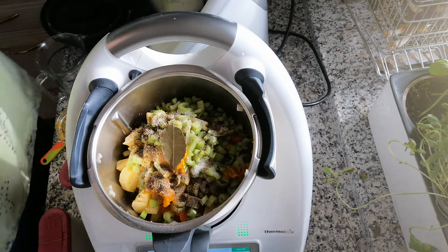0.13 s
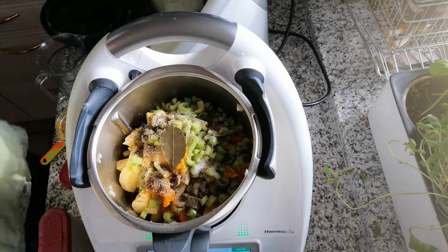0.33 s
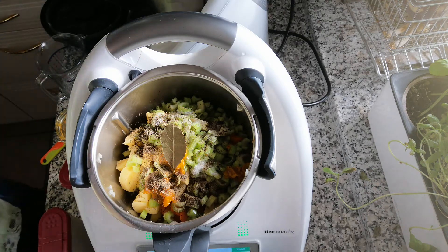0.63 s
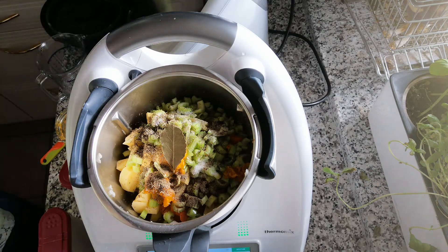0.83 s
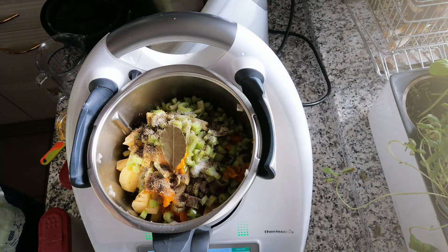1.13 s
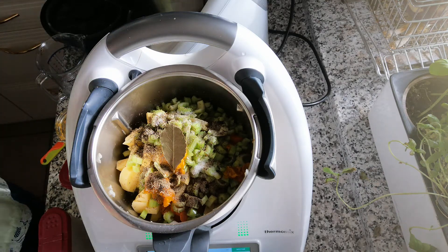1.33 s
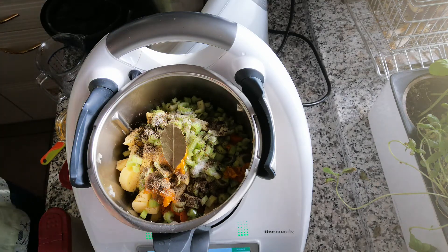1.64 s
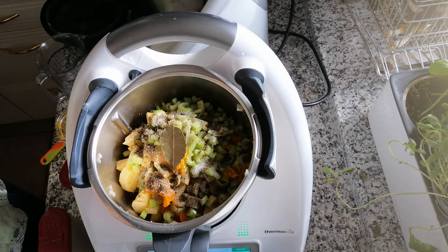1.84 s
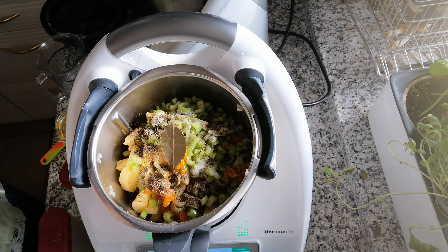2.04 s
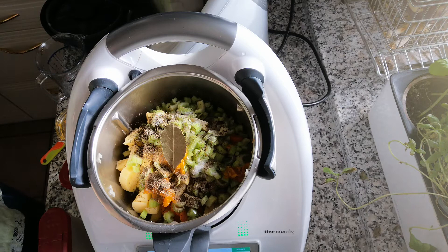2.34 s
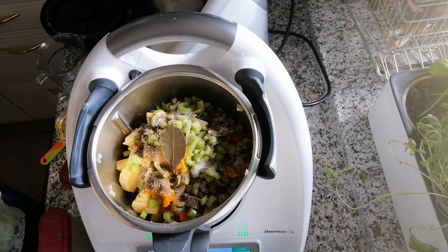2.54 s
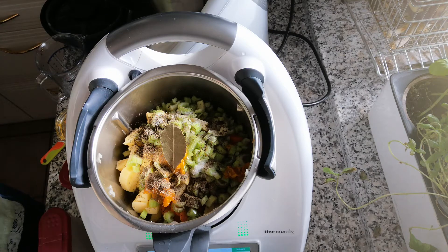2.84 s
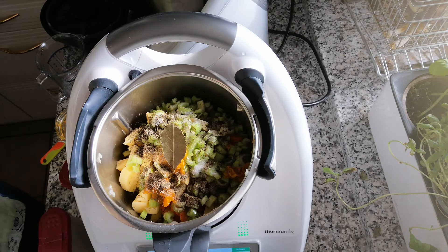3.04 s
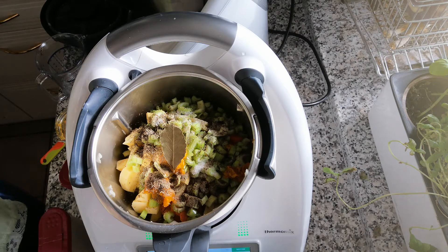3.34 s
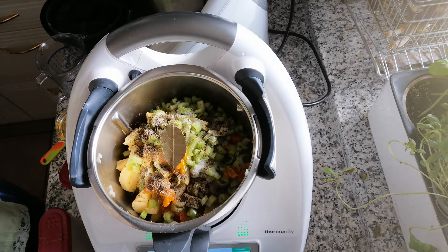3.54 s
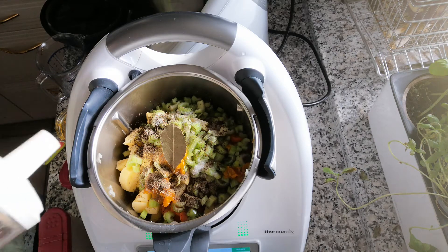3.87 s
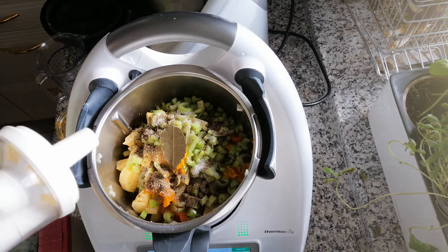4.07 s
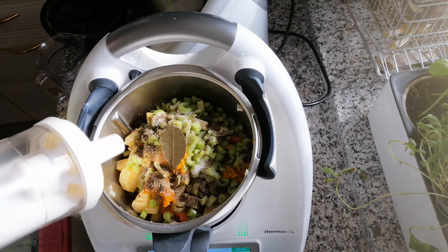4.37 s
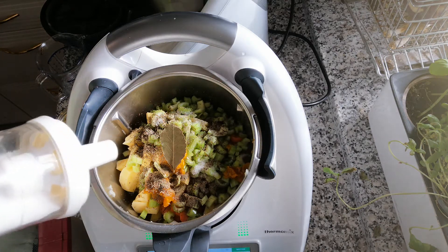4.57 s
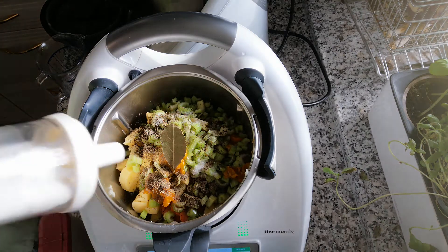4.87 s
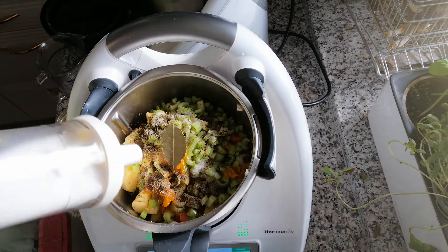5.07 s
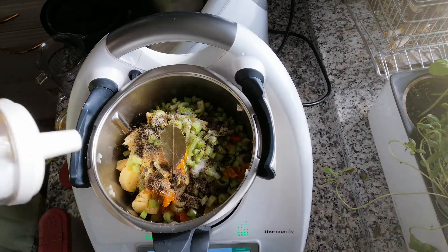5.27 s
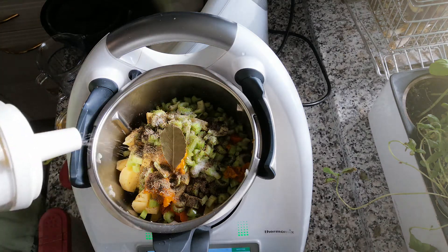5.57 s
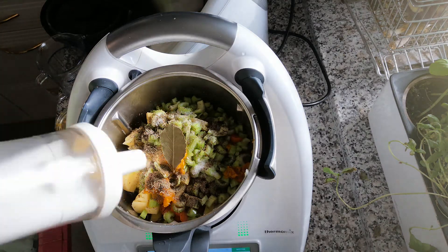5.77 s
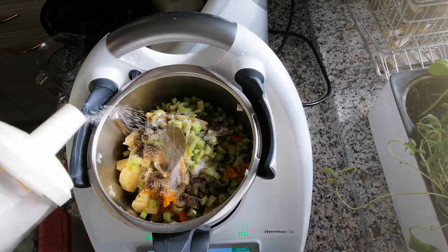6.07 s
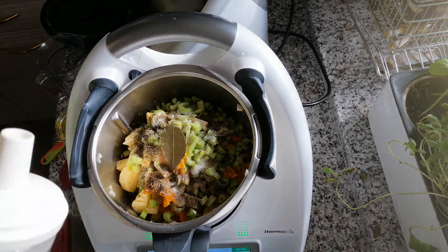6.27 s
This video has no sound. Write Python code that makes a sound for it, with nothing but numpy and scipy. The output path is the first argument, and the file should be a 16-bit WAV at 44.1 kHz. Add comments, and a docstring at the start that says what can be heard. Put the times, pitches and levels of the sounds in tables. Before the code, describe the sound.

Plastic and glass containers knock in a small kitchen, one ringing brightly, a cap pops, then sugar hisses in bursts from a shaker.

```python
"""Containers are handled in a small hard-walled kitchen: a plastic tub, a glass jar, a sugar shaker and a shelf
sound as damped modes with a contact click, except the shaker, which has modes alone; a popped cap adds neck air.
Sugar slides in the shaker and is shaken out over the food as dense random impacts, coloured by where they land.
Small ticks and an early scuff join in; echoes and a decaying noise tail make the room.
Behind it all a refrigerator hums as narrow noise bands in broad room air."""
import sys
import numpy as np
from scipy import signal
from scipy.fft import rfft, irfft, next_fast_len
from scipy.io import wavfile

SR = 44100
rng = np.random.default_rng(int(sys.argv[2]) if len(sys.argv) > 2 else 0)


def digitize_waveform(pressure):
    """Quantize a signal to 16-bit integers and store it at the path in sys.argv[1].

    Rows of a 2-D input are taken as channels; values are limited to [-1, 1].
    """
    field = np.atleast_2d(pressure).T
    bounded = np.clip(field, -1, 1)
    quanta = np.round(bounded * 32767).astype(np.int16)
    wavfile.write(sys.argv[1], SR, quanta)


N = 282548
TIME = np.arange(N) / SR
SIDES = np.array([[.5], [-.5]])   # times a left-minus-right difference: the share of each channel

# Blow on the jar: start_s, strength_db, left_minus_right_db, left_lag_ms
JAR_BLOWS = [(0.8803, -18.5, -2.5, -0.029)]


def tub():
    """Modal impact: a knocked plastic tub has few, heavily damped modes under a contact click."""
    # Knocks: start_s, strength_db, left_minus_right_db, left_lag_ms
    tub_blows = [(.5797, -18.5, -4, -.02)]
    # Modes of the tub: pitch_hz, level_db, t60_s
    tub_modes = [(289, -34.5, 0.1), (605, -30, 0.026), (2360, -26, 0.011)]
    # Spectrum of the contact click: frequency_hz, relative_db (per Hz)
    tub_click = [(120, -41.5), (200, -35.5), (310, -12), (520, -27.5), (750, -5), (1020, -5.5), (1360, -12),
                 (1900, -9.5), (2420, 2), (3010, -14.5), (4500, -23), (6200, -34), (8000, -52),
                 (10600, -41), (15000, -68)]
    knock = ringing(tub_modes, contact_s=0.00034)
    knock += crack(tub_click, db=5.0, rattle_db=-19.0, t60=0.033)
    return no_bass(place(tub_blows, knock), hz=224.4)


def jar():
    """Modal impact: the glass body rings briefly after a very short, bright contact."""
    # Modes of the jar body: pitch_hz, level_db, t60_s
    body_modes = [(286, -28, 0.091), (408, -25, 0.052), (2760, -32, 0.021), (3940, -12, 0.028)]
    # Spectrum of the contact click: frequency_hz, relative_db (per Hz)
    jar_click = [(120, -30), (200, -33), (600, -13), (1100, -4.5), (2000, -3), (2750, 0.5), (3700, -3),
                 (5100, -11.5), (7500, -9.5), (9000, -12), (13000, -17), (15500, -71)]
    knock = ringing(body_modes, contact_s=0.000076)
    knock += crack(jar_click, db=3.5, rattle_db=-17.0, t60=0.065)
    return no_bass(place(JAR_BLOWS, knock), hz=224.4)


def glass_ring():
    """Energy storage: the thin jar wall sings on; the room stores each tone, so it holds and then falls."""
    # Wall modes: pitch_hz, level_db, t60_s, left_minus_right_db,
    # lobe_sign (1 or -1: same or opposite lobe faces each side)
    wall_modes = [(3461, -40.5, .4, -2, -1), (4226, -50, .3, -3, 1), (5454, -28.5, .33, -6, 1),
                  (6342, -48, .3, -1, -1), (8005, -42, .25, -4, -1), (9900, -54, .18, 3, 1),
                  (10350, -53, .19, 0, -1), (11410, -60, .14, 0, 1), (12760, -52, .09, 0, 1)]
    start_s, _, _, lag_ms = JAR_BLOWS[0]
    t = np.maximum(TIME - start_s - SIDES * lag_ms / 1000, 0)
    stored = (1 + 25 * t) * (1 - np.exp(-t / .003))
    rings = 0
    for hz, db, t60, pan_db, lobe in wall_modes:
        gain = from_db(db + pan_db * SIDES - 60 * t / t60)
        rings = rings + gain * [[1], [lobe]] * np.sin(2 * np.pi * hz * t)
    return stored * rings


def cap_pop():
    """Cavity resonance: the cap springs free with its own modes while the air in the neck swells and dies."""
    # Pops: start_s, strength_db, left_minus_right_db, left_lag_ms
    pops = [(2.8503, -8.5, -5.5, 0.13)]
    # Modes of the cap: pitch_hz, level_db, t60_s
    cap_modes = [(283.8, -27.5, .06), (374, -31.5, 0.14), (540.6, -18.5, 0.052), (876, -6.5, .13),
                 (1037, -19, 0.07), (1065, -16.5, .13), (1350, -34.5, .03)]
    # Spectrum of the release click: frequency_hz, relative_db (per Hz)
    cap_click = [(880, -33.5), (1500, -1.5), (2000, -6.5), (2400, 0.5), (2800, -12.5), (3300, -1.5),
                 (3800, 4), (4500, -14.5), (5200, -13), (6000, -27.5), (12000, -46.5), (16000, -71.5)]
    neck_hz, neck_width_hz = 946, 320
    pop = ringing(cap_modes, contact_s=0.001521) + swell(neck_hz, neck_width_hz, order=3)
    pop += crack(cap_click, db=-20.5, rattle_db=-10, t60=.2)
    return no_bass(place(pops, pop), hz=224.4)


def shaker():
    """Modal impact: a longer contact leaves only the modes of the bumped shaker, without a click."""
    # Bumps: start_s, strength_db, left_minus_right_db, left_lag_ms
    shaker_blows = [(2.071, -21, 6, 0.12), (2.076, -21.5, -12, .2), (2.1245, -26.5, -13.5, .2),
                    (2.168, -38, -13, .2)]
    # Modes of the shaker: pitch_hz, level_db, t60_s
    shaker_modes = [(522, -10, 0.033), (755.3, -8, 0.081), (881, -1.5, 0.052), (923, -16, 0.086),
                    (1020, -31, 0.067), (1060, -23, 0.21)]
    return no_bass(place(shaker_blows, ringing(shaker_modes, contact_s=0.00097)), hz=224.4)


def shelf():
    """Modal impact: a large body has low modes, so bumps on the shelf thud and rattle."""
    # Bumps: start_s, strength_db, left_minus_right_db, left_lag_ms
    shelf_bumps = [(.72, -50, -3.5, .1), (2.0492, -16.5, -8.5, 0.25)]
    # Modes of the shelf: pitch_hz, level_db, t60_s
    shelf_modes = [(118, -0.5, 0.12), (145, -8.5, 0.24), (214, -3, 0.019), (431.4, -7, 0.044),
                   (570, -24.5, 0.13)]
    # Spectrum of the contact click: frequency_hz, relative_db (per Hz)
    shelf_click = [(100, -19.5), (300, -5), (700, 0.5), (1100, -9), (1500, -15.5), (2700, -11.5),
                   (4000, -27.5), (8000, -51)]
    thud = ringing(shelf_modes, contact_s=0.0012)
    thud += crack(shelf_click, db=-16, rattle_db=-15, t60=0.43)
    return -no_bass(place(shelf_bumps, thud), hz=45.2)


def sugar():
    """Granular flow: crystals ring the shaker inside, click brightly in the open and tap the walls lower."""
    # Slides and tosses: full_strength_s, level_db, rise_s and fall_s (over 20 dB), hold_s,
    # wall_taps_relative_db, left_minus_right_db, share_outside (0-1)
    slides = [(1.313, -69, .07, 0.14, .003, -0.5, -4.5, .15),
              (1.49, -63, 0.063, 0.14, 0.064, -10.5, -2.7, .02),
              (1.752, -75.5, .01, 0.28, .003, -3, 0.5, 0.45),
              (2.009, -60, 0.0072, 0.062, .003, -6, 1.5, 0.37),
              (2.059, -50.5, 0.018, .12, 0.0099, 0.5, -1, 0.35),
              (2.24, -69.5, 0.21, 0.26, 0.019, -13, -2, .4), (3.2, -71, .2, 0.28, 0.02, -27.5, -5, 0.023),
              (3.66, -69, 0.2, 0.087, 0.014, -9, -2, 0.35), (4.0, -60, 0.24, .18, 0.17, -15.5, -3, 0.25),
              (4.64, -71, 0.53, 0.15, .02, -21, -3, .4),
              (4.885, -54.5, 0.069, 0.14, 0.05, -12.5, -3.5, .15),
              (5.18, -55.5, 0.078, 0.085, 0.019, -9.5, -5, .2),
              (5.24, -58.5, .01, .05, 0.002, -19.5, -1, 0.77),
              (5.28, -48, 0.034, 0.045, .003, -16, -1.5, 0.66),
              (5.33, -60, .05, 0.071, .003, -18, -1, 0.67), (5.78, -61.5, 0.044, 0.069, .02, -15, -7, 0.32),
              (5.84, -58, 0.046, .1, .003, -8.5, -4.5, 0.11), (5.944, -57, .004, 0.02, .003, -25, -1, .7),
              (6.07, -44, 0.1, 0.089, 0.054, -15, -1, 0.77), (6.39, -49, 0.17, .1, .03, -14.5, -3.5, 0.34)]
    # Spectra of grains inside, in the open and on the walls: frequency_hz, relative_db (per Hz)
    inside_colour = [(2350, -35), (4000, -13.5), (4330, -15), (5430, -6), (6370, -5), (7250, 2.5),
                     (8120, -7.5), (9570, -1.5), (14300, -20.5), (15200, -21.5), (15500, -31)]
    outside_colour = [(2350, -30.5), (4000, -5), (4560, -14), (5370, -2), (7210, -4), (8260, -7.5),
                      (11100, -1), (14600, -12), (15500, -18)]
    wall_colour = [(470, -48), (800, -15.5), (1230, -10.5), (1630, -21), (1920, -3.5), (3080, -2.5),
                   (5000, -10.5), (6500, -29.5), (11000, -120)]
    near = .25   # power share that both sides hear alike
    right_lag = 2   # samples by which the right side hears the shared grains later
    wall_flank = 1.16   # wall taps come and go this many times faster in dB than the hiss

    shared, left, right = (grains(9000, spread_db=3.0) for _ in range(3))
    common = np.array([shared, np.roll(shared, right_lag)])
    pair = np.sqrt(near) * common + np.sqrt(1 - near) * np.array([left, right])
    inside = coloured(pair, inside_colour)
    outside = coloured(pair, outside_colour)
    walls = coloured(pair, wall_colour)
    out = 0
    for s, db, rise_s, fall_s, hold_s, wall_db, pan_db, share in slides:
        flow = swelling(s, 0, rise_s, fall_s, hold_s, roundness=1.7)
        hiss = flow * ((1 - share) * inside + share * outside)
        taps = from_db(wall_db) * flow ** wall_flank * walls
        out = out + from_db(db + pan_db * SIDES) * (hiss + taps)
    return out


def ticks():
    """Heavy damping: taps of lids and fingers are short resonances that chatter for a few milliseconds."""
    # Ticks: start_s, strength_db, left_minus_right_db, pitch_hz, width_hz
    small_taps = [(1.192, -61, -7, 6600, 1500), (1.265, -52, -5, 5850, 4100), (1.457, -53, -3, 6000, 5000),
                  (1.75, -51, -11, 4050, 1490), (1.8, -58, -3, 4000, 2500), (1.193, -73, 4, 11000, 1480),
                  (2.009, -43, 15, 10800, 3000), (2.01, -49, -7.5, 1270, 910),
                  (2.011, -36.5, -3, 6650, 2970), (2.055, -31.5, -12, 6650, 5040),
                  (2.055, -40.5, -4, 2730, 400), (2.071, -28, -11.5, 4300, 1530),
                  (2.115, -40, -1, 4630, 1500), (2.19, -45.5, -5, 3770, 2050), (2.277, -59, -14, 3603, 400),
                  (5.157, -54, -2, 704, 502), (5.17, -60, -4, 392.7, 300), (5.819, -60, 0, 350, 300),
                  (5.232, -46, 2, 11100, 4000), (5.4, -54.5, 9, 9100, 8000), (5.943, -45, -1, 6220, 6000),
                  (5.98, -52, -2, 8000, 6000)]
    out, t = 0, TIME[:400]
    for s, db, pan_db, hz, width_hz in small_taps:
        chatter_gain = from_db(-17.5 - 60 * t / 0.013) * hz / SR * 10
        touches = rng.standard_normal(len(t)) * chatter_gain
        touches[0] = 1
        tick = np.convolve(swell(hz, width_hz, order=1)[:2000], touches)
        out = out + place([(s, db, pan_db, 0)], tick)
    return no_bass(out, hz=150)


def drag():
    """Friction as dense small impacts: a dull scuff catches at once and fades."""
    # Spectrum of the scuff: frequency_hz, relative_db (per Hz)
    drag_colour = [(120, -35), (200, 2), (362, -9), (612, -2), (790, -7), (1900, -11), (5000, -40),
                   (6500, -70.5), (11000, -120)]
    rub = np.array([grains(3000, spread_db=0.0), grains(3000, spread_db=3.0)])
    gain = swelling(s=0.074, db=-56, rise_s=.005, fall_s=.12, hold_s=0.039, roundness=0.86)
    return gain * from_db(-3.5 * SIDES) * coloured(rub, drag_colour)


def kitchen(x):
    """Reverberation: a few dull mirror echoes, then a dense tail that dies band by band."""
    # First echoes: delay_s, left_db, right_db
    first_echoes = [(.0037, -7, -29.5), (.0047, -27.5, -6.5), (.0095, -18, -26), (.011, -13.5, -18.5),
                    (0.021, -11.5, -13)]
    # Decay time of the tail: frequency_hz, t60_s
    decay = [(100, 0.48), (500, 0.37), (2000, 0.35), (5000, 0.38), (12000, .22)]
    # Likeness of the two channels of the tail: frequency_hz, likeness (-1 to 1)
    tail_likeness = [(100, .9), (400, .6), (1200, .2), (4000, 0.31)]
    # Tone of the tail: frequency_hz, relative_db
    tail_colour = [(60, -6), (150, -5), (400, 1.5), (1000, 0), (2500, -2), (5000, -4), (12000, -1.5)]
    t = TIME[:round(.7 * SR)]
    white = stereo(*rng.standard_normal((2, len(t))), tail_likeness)
    edges_hz = 22 * 2 ** np.arange(0, 9.7, .4)
    tail = 0
    for low, high in zip(edges_hz, edges_hz[1:]):
        band = signal.sosfilt(signal.butter(2, [low, high], "band", fs=SR, output="sos"), white)
        hz = np.sqrt(low * high)
        tail = tail + band * from_db(-24 + at_hz(tail_colour, hz) - 60 * t / at_hz(decay, hz))
    near_walls = 1 + 1.5 * np.exp(-t / 0.0098)   # the counter and cupboards crowd the start

    echoes = np.zeros((2, len(t)))
    for delay_s, left_db, right_db in first_echoes:
        echoes[:, round(delay_s * SR)] = from_db([left_db, right_db])
    # rough surfaces mirror only the lows
    echoes = signal.sosfilt(signal.butter(2, 1500, fs=SR, output="sos"), echoes)
    response = echoes + tail * near_walls * np.clip(t / 0.0015, 0, 1)
    mono = x.mean(axis=0, keepdims=True)
    return signal.fftconvolve(mono, response, axes=1)[:, :N] * from_db(-3 * SIDES)


def room_air():
    """Filtered noise: steady broad air, and a refrigerator hum that wavers because its bands are narrow."""
    # Spectrum of the air: frequency_hz, relative_db (per Hz)
    air_colour = [(13, -30), (22, 2), (38, -2), (87, -4), (143, -14), (200, -3), (286, -13), (496, -14),
                  (1200, -20), (3060, -22), (7390, -30), (8490, -31.5), (10900, -33), (14700, -42),
                  (16000, -49)]
    # Likeness of the two channels: frequency_hz, likeness (-1 to 1)
    air_likeness = [(30, 0.96), (150, 0.2), (400, 0.22), (1000, 0.1), (5000, 0.13), (15000, 0.5)]
    # Hum bands: centre_hz, width_hz, level_db (before the tilt and bass cut below)
    hum = [(51, 8, -78.5), (102.5, 10, -77.5), (196, 3.14, -74.5), (286, 8, -90.5)]
    white = rng.standard_normal((4, N))
    air = from_db(-68) * coloured(stereo(white[0], white[1], air_likeness), air_colour)
    hum_noise = white[2] + 0.58 * white[3] * SIDES
    for hz, width_hz, db in hum:
        edges = [hz - width_hz / 2, hz + width_hz / 2]
        band = signal.butter(1, edges, "band", fs=SR, output="sos")
        air += from_db(db) * rms_one(signal.sosfilt(band, hum_noise))
    return from_db(-4 * SIDES) * no_bass(air, hz=32.6)


def ringing(modes, contact_s):
    """Modal synthesis: the dying sines of one struck body grow while the contact lasts."""
    t = TIME[:SR]
    rings = sum(from_db(db - 60 * t / t60) * np.sin(2 * np.pi * hz * t) for hz, db, t60 in modes)
    return rings * (1 - np.exp(-t / contact_s)) ** 2


def swell(hz, width_hz, order):
    """Cascaded resonance: it swells, sooner at low order, and dies; envelope height 1."""
    rise = np.pi * width_hz * TIME[:SR] / order
    return (rise * np.exp(1 - rise)) ** order * np.sin(2 * np.pi * hz * TIME[:SR])


def crack(spectrum, db, rattle_db, t60):
    """Minimum phase: a click and its rattle are coloured so that nothing precedes contact; db is the peak."""
    t = TIME[:SR]
    hz = np.maximum(np.arange(SR // 2 + 1), 1)
    cepstrum = irfft(np.log(from_db(at_hz(spectrum, hz))), SR)
    # folding the cepstrum onto positive time makes the filter causal
    cepstrum[1:SR // 2] *= 2
    cepstrum[SR // 2 + 1:] = 0
    touches = rng.standard_normal(SR) * from_db(rattle_db - 60 * t / t60)
    touches[0] = -1
    sound = irfft(rfft(touches) * np.exp(rfft(cepstrum)), SR)
    return from_db(db) * sound / np.abs(sound).max()


def grains(per_s, spread_db):
    """Shot noise: dense random impacts of uneven size and either sign; rms 1."""
    sizes = from_db(spread_db * np.minimum(rng.exponential(1, N), 4)) * rng.choice([-1, 1], N)
    return rms_one(sizes * (rng.random(N) < per_s / SR))


def swelling(s, db, rise_s, fall_s, hold_s, roundness):
    """Envelope: gain climbs 20 dB in the rise, holds, and drops 20 dB in the fall."""
    before = (s - TIME) / rise_s
    after = (TIME - s - hold_s) / fall_s
    away = np.maximum(np.maximum(before, after), 0)
    # roundness 1: dB moves evenly; more: a rounder top with steeper flanks
    return from_db(db - 20 * away ** roundness)


def place(blows, sound):
    """Stereo localisation: one copy of a short sound for each blow, panned in level and arrival time."""
    out = np.zeros((2, N))
    for s, db, pan_db, lag_ms in blows:
        for side, sign in enumerate((.5, -.5)):
            at = round((s + sign * lag_ms / 1000) * SR)
            out[side, at:at + len(sound)] += from_db(db + pan_db * sign) * sound[:N - at]
    return out


def stereo(mid, side, likeness):
    """Coherence: mix two unrelated signals so that the channels are alike as given at each frequency."""
    size = next_fast_len(len(mid))
    hz = np.maximum(np.arange(size // 2 + 1) * SR / size, 1)
    alike = at_hz(likeness, hz)
    pair = np.sqrt(1 + alike) * rfft(mid, size) + 2 * SIDES * np.sqrt(1 - alike) * rfft(side, size)
    return irfft(pair, size)[:, :len(mid)] / np.sqrt(2)


def coloured(x, spectrum):
    """Spectral shaping: give noise a spectrum; rms 1."""
    size = next_fast_len(x.shape[-1])
    hz = np.maximum(np.arange(size // 2 + 1) * SR / size, 1)
    shaped = irfft(rfft(x, size) * from_db(at_hz(spectrum, hz)), size)
    return rms_one(shaped[..., :x.shape[-1]])


def no_bass(x, hz):
    """Radiation efficiency: small bodies radiate little below their lowest mode."""
    return signal.sosfilt(signal.butter(2, hz, "high", fs=SR, output="sos"), x)


def at_hz(points, hz):
    """Interpolation: read a table on a log-frequency axis."""
    table = np.array(points)
    return np.interp(np.log(hz), np.log(table[:, 0]), table[:, 1])


def rms_one(x):
    """Normalisation: scale to rms 1."""
    return x / np.sqrt(np.mean(x ** 2) + 1e-20)


def from_db(db):
    """Logarithmic level: decibels to gain."""
    return 10 ** (np.asarray(db) / 20)


def scene():
    """Superposition: direct sounds, their shared room sound and the background add up."""
    # the gain beside each source is its send to the room (dB): more makes it sound farther away
    sends = [(tub(), -2), (jar(), 5), (cap_pop(), -2.5), (shaker(), -5.5),
             (shelf(), -6.5), (ticks(), -1), (sugar(), -7)]
    direct = sum(sound for sound, _ in sends)
    room = kitchen(sum(from_db(send_db) * sound for sound, send_db in sends))
    return direct + room + glass_ring() + drag() + room_air()


def record(dry):
    """Band limiting: a steep low-pass cuts the top."""
    return signal.sosfilt(signal.cheby2(22, 45, 15500, fs=SR, output="sos"), dry)


dry = scene()
out = record(dry)
digitize_waveform(out)
```